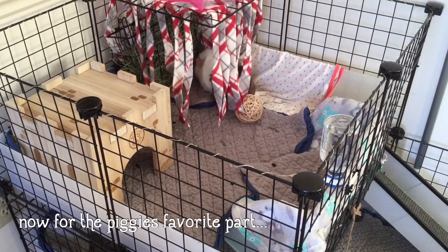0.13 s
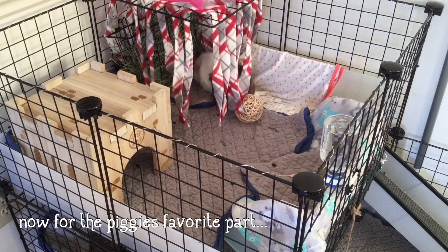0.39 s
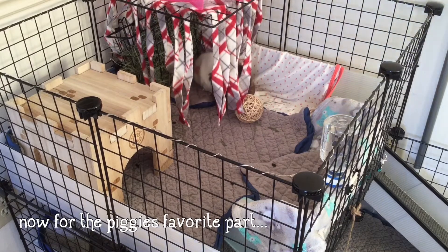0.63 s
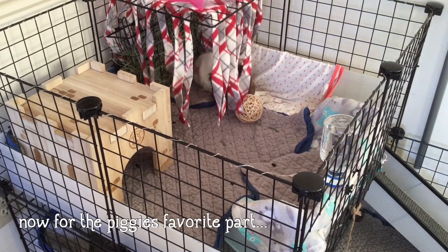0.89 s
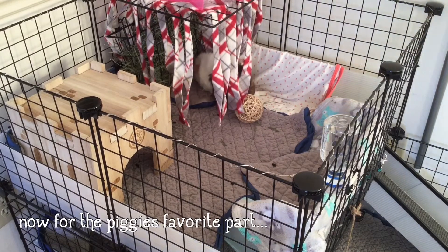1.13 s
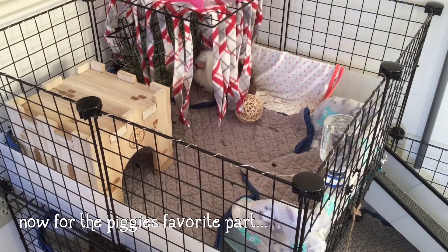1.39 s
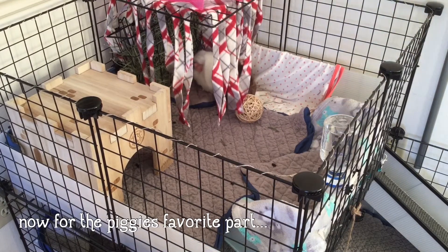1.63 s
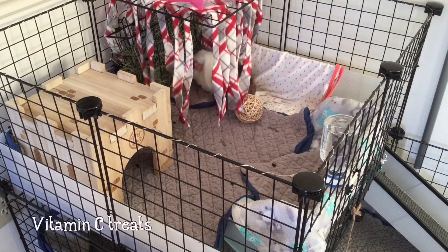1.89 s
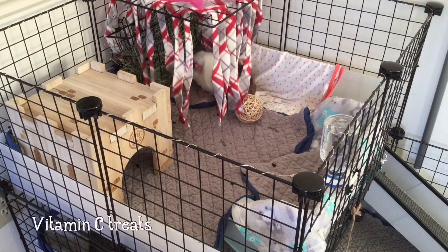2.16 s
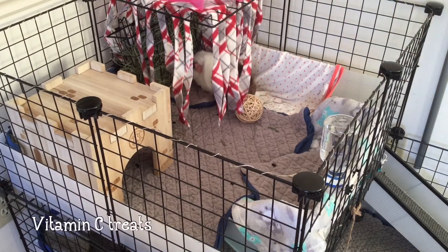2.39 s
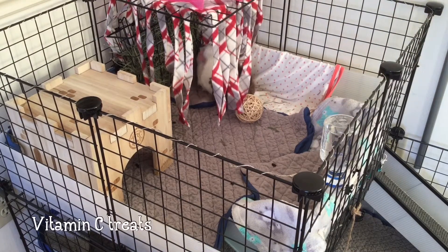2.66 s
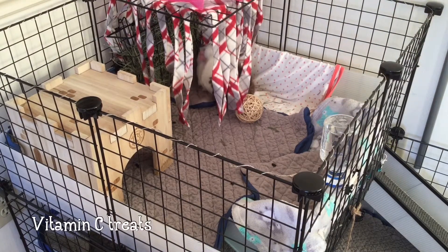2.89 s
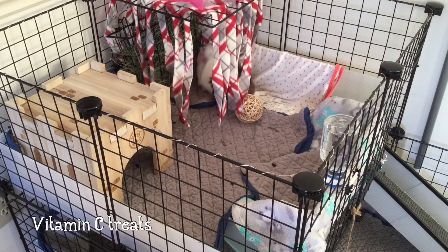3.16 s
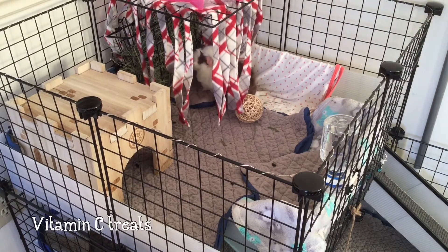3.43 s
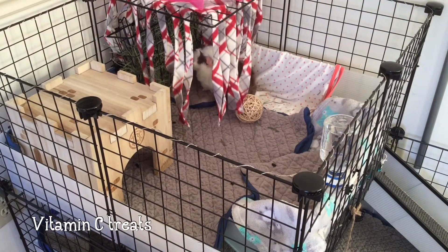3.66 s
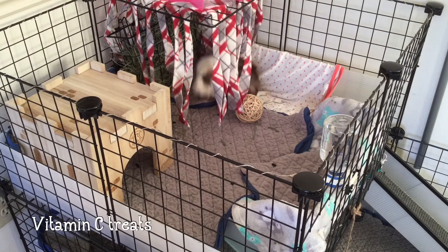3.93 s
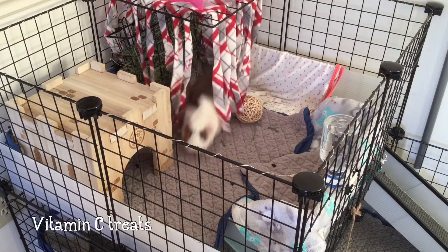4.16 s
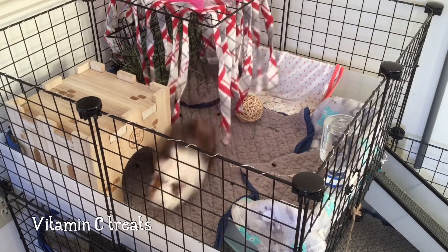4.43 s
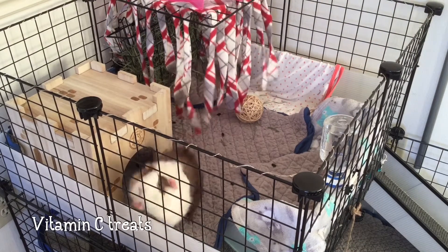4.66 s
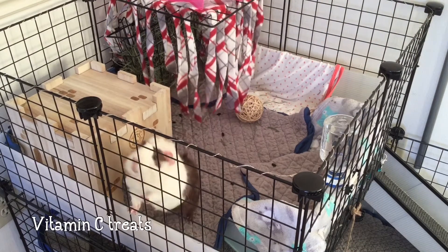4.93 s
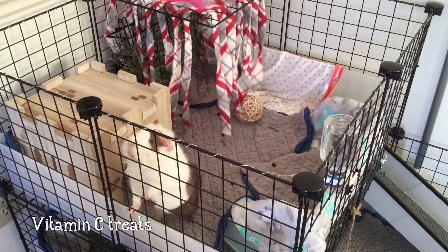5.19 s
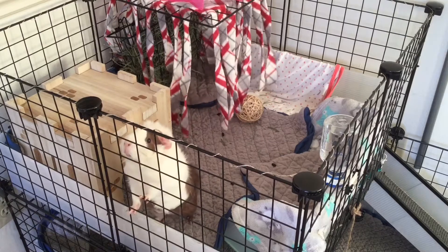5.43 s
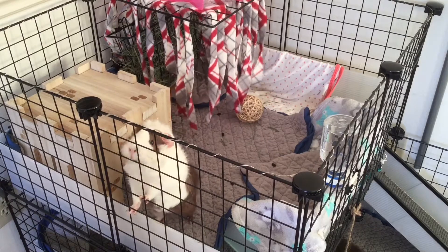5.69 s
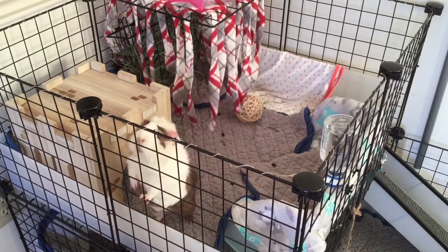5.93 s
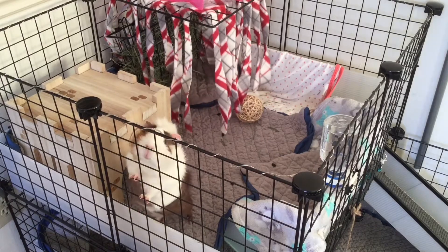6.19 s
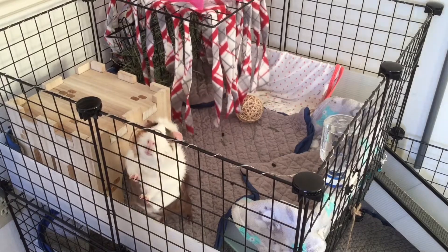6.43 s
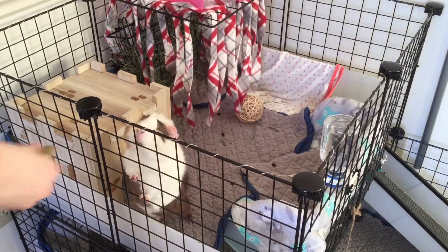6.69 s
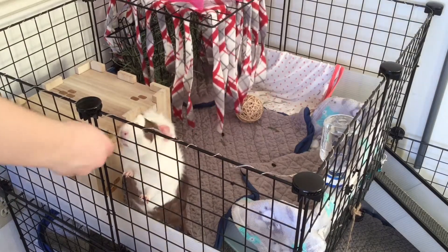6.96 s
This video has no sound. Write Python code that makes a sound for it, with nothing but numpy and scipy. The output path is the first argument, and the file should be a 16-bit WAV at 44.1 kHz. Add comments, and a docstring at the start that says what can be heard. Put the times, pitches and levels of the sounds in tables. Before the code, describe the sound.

A quiet room with a faint low rumble and thin hiss, heard closely. From 0 to 1 s, treats tap lightly inside a crinkly packet, with clear pairs of clicks near 0.06 and 0.7 s and slight rustle. One bright film crack comes at 1.2 s, then a little cluster of taps near 1.75 s. From 2 s the handling grows busy: irregular rustling, crackles and soft padded thuds. The strongest snaps come at about 3.0 to 3.4 s, with a knock on the cage near 3.17 s. Swishing, crisp rustle surges at 3.8 and 4.2 to 4.6 s over dull thumps, dips around 4.85 s, and bursts again with hollow taps at 5.3 to 5.4 s. After 5.5 s it falls away quickly to sparse soft bumps, tiny rubbing squeaks and isolated taps, nearly still by 7 s.

```python
"""A crinkly treat packet is handled beside a small-animal cage, close to the microphone, in a quiet room.
From the start the room rumbles and hisses faintly, the film rustles in random slips and the floor drums.
Taps of the contents, soft thuds and knocks on the cage soon join in, then slower sweeps and faint squeaks.
After a second the film starts to crack. Handling is busiest from two to five and a half seconds, then fades.
Snaps are noise jolts in resonances and thuds are short decaying tones, each with a noise tail for the room."""
import sys
import numpy as np
from scipy import signal
from scipy.fft import rfft, irfft, next_fast_len
from scipy.io import wavfile
from scipy.ndimage import uniform_filter1d, map_coordinates

SR = 44100
rng = np.random.default_rng(int(sys.argv[2]) if len(sys.argv) > 2 else 0)


def digitize_waveform(pressure):
    """Quantize a signal to 16-bit integers and store it at the path in sys.argv[1].

    Rows of a 2-D input are taken as channels; values are limited to [-1, 1].
    """
    field = np.atleast_2d(pressure).T
    bounded = np.clip(field, -1, 1)
    quanta = np.round(bounded * 32767).astype(np.int16)
    wavfile.write(sys.argv[1], SR, quanta)


def linear_from_db(decibels):
    """Turn decibels (scalar or array-like) into linear amplitude factors; 0 gives 1."""
    return 10 ** (np.asarray(decibels, float) / 20)


N = 311787  # length in samples


def unit(x):
    """Scaled to rms 1."""
    return x / np.sqrt(np.mean(x ** 2) + 1e-20)


def along(points, hz):
    """Values between (Hz, value) points, on a log frequency axis."""
    point_hz, value = np.transpose(points)
    return np.interp(np.log(hz + 1), np.log(point_hz + 1), value)


def filtered(x, response):
    """x times a response of frequency."""
    size = next_fast_len(x.shape[-1] + 8192)
    hz = np.fft.rfftfreq(size, 1 / SR)
    return irfft(rfft(x, size) * response(hz), size)[..., :x.shape[-1]]


def shaped(x, points):
    """x coloured by a curve of (Hz, dB) points."""
    return filtered(x, lambda f: linear_from_db(along(points, f)))


def band(hz, width):
    """Response of a causal resonance that passes 1 at its centre."""
    return lambda f: 1j * f * width / (hz * hz - f * f + 1j * f * width)


def packet(f, flat_db):
    """The packet's resonances, alternating in sign, over a flat response."""
    # Each row: centre in Hz, width in Hz, gain in dB.
    resonances = [(312, 43, -19), (625, 23, 15.5), (1111, 15, 1), (1326, 65, 9), (2420, 390, 7),
                  (3200, 32, -39.5)]
    response = linear_from_db(flat_db)
    for k, (hz, width, db) in enumerate(resonances):
        response = response + (-1) ** k * linear_from_db(db) * band(hz, width)(f)
    return response


def wobble(rate):
    """A smooth random curve, rate knots a second."""
    knots = rng.standard_normal(int(N * rate / SR) + 4)
    return map_coordinates(knots, [np.arange(N) * rate / SR])


def grains(rate, spread_db):
    """Random slips, rate a second; a positive spread makes a few much larger, a negative one much smaller."""
    struck = rng.random(N) < rate / SR
    return struck * rng.standard_normal(N) * linear_from_db(spread_db * rng.exponential(size=N))


def tails(count):
    """Room answers of energy 1: noise in which each frequency dies at its own speed."""
    # Reverberation of the room. Each row: frequency in Hz, time to fall by 60 dB in seconds.
    room = [(150, 0.22), (1000, 0.25), (5000, 0.13), (13000, 0.25)]
    hz, t, z = signal.stft(rng.standard_normal((count, SR // 3)), SR, nperseg=256)
    decay = linear_from_db(-60 * t / along(room, hz)[:, None])
    tail = signal.istft(z * decay, SR, nperseg=256)[1]
    tail = np.pad(tail, ((0, 0), (SR // 250, 0)))  # the nearest wall answers after 4 ms
    return tail / np.linalg.norm(tail, axis=1, keepdims=True)


def laid(times, sounds, wet_db):
    """Each sound at its time, with its own room answer."""
    wet = signal.fftconvolve(sounds, tails(count=len(sounds)), axes=1)
    out = np.zeros(N + 2 * SR)
    for s, dry, answer in zip(times, sounds, wet):
        start = round(s * SR)
        out[start:start + len(dry)] += dry
        out[start:start + len(answer)] += linear_from_db(wet_db) * answer
    return out[:N]


def peaked(x, db):
    """x scaled to a peak in dB."""
    return linear_from_db(db) * x / np.abs(x).max()


def creases(rows, crumple_db=-26, crumb_db=7, rise=0.002, wet_db=-3):
    """A crease jolts and crumples on; hollow body, crisp edge, film and low knock each answer in their range.

    Each row: start in seconds, body, edge and film peak in dB, knock rms in dB, crumpling t60 in seconds."""
    t = np.arange(6144) / SR
    jolt_s = 0.0012  # time constant of the jolt's decay
    sounds = []
    for s, body_db, edge_db, film_db, knock_db, t60 in rows:
        noise = rng.standard_normal((5, len(t)))
        edge_hz = 2613 * np.exp(0.18 * noise[0, 0])  # each edge rings at its own pitch
        crumbs = linear_from_db(crumb_db * unit(uniform_filter1d(noise[4], size=60)))  # uneven crumbs
        crumple = linear_from_db(crumple_db - 60 * t / np.clip(t60, 0.004, 0.3)) * crumbs * noise[:4]
        jolt = (t == 0) + 0.29 * np.exp(-t / jolt_s) * noise[3::-1]
        for_body, for_edge, for_film, for_knock = crumple * (1 - np.exp(-t / rise)) + jolt
        body = filtered(for_body, lambda f: band(1150, 1300)(f) ** 3 * packet(f, flat_db=5.0))
        edge = filtered(for_edge, lambda f: band(edge_hz, 1.2 * edge_hz)(f) ** 4)
        film = filtered(for_film, lambda f: band(11000, 17000)(f) ** 3)
        knock = filtered(for_knock, lambda f: band(400, 450)(f) ** 3)
        knock = knock / np.std(knock[:SR // 80])  # rms 1 over its first 12.5 ms
        bright = peaked(edge, edge_db) + peaked(film, film_db)
        sounds.append(peaked(body, body_db) + bright + linear_from_db(knock_db) * knock)
    return laid([row[0] for row in rows], np.array(sounds), wet_db)


def air():
    """The room's low rumble and faint hiss: shaped noise, wavering a little."""
    # Spectrum of the room. Each row: frequency in Hz, relative level in dB.
    spectrum = [(15, -63.5), (30, -12), (45, 7), (76, 0), (180, -12.5), (326, -14.5), (427, -24),
                (624, -25.5), (863, -38.5), (1650, -45), (2160, -35), (3820, -44.5), (14800, -75.5),
                (16000, -37.5)]
    noise = shaped(rng.standard_normal(N), spectrum)
    return linear_from_db(-64.5 + 0.4 * wobble(0.98)) * unit(noise)


def handling():
    """Clumped slips of the film in the packet's resonances, a finer hiss, and the floor drumming."""
    # Loudness of the rustle. Each row: time in seconds, level in dB.
    rustle_level = [(0, -63), (.16, -70), (.4, -72.5), (.55, -91), (.71, -76), (.85, -67), (1.02, -79.5),
                    (1.4, -81.5), (1.6, -77), (1.9, -72.5), (2.1, -55), (2.45, -58.5), (2.68, -52),
                    (2.8, -64), (3.15, -47.5), (3.29, -59), (3.5, -69.5), (3.68, -55.5), (3.82, -44.5),
                    (3.95, -51.5), (4.2, -46), (4.42, -52.5), (4.6, -51.5), (4.88, -65.5), (5.1, -56),
                    (5.3, -49), (5.48, -69), (5.9, -76), (7.07, -86.5)]
    # Loudness of the film's fine hiss. Each row: time in seconds, level in dB.
    hiss_level = [(0, -78), (.5, -79), (.8, -74.5), (1.05, -80.5), (1.9, -82), (2.3, -69), (2.45, -77),
                  (2.6, -67), (2.78, -77), (2.9, -64), (3.3, -67), (3.55, -68), (3.69, -71), (3.75, -52.5),
                  (3.95, -60), (4.2, -51), (4.45, -54.5), (4.67, -61.5), (4.8, -72), (4.86, -60),
                  (5.12, -59), (5.3, -52), (5.47, -76), (5.6, -79.5), (7.07, -80)]
    # Spectra of rustle, hiss and drumming. Each row: frequency in Hz, relative level in dB.
    rustle_spectrum = [(160, -7.5), (280, -3), (377, -3), (414, -12), (672, -3.5), (993, -14.5),
                       (1180, -5.5), (1410, -11.5), (7000, -28.5), (9100, -52.5), (15400, -120)]
    hiss_spectrum = [(2650, -1.5), (4500, -4), (7500, -6), (12000, -5.5), (15600, -4.5), (16200, -37.5)]
    drum_spectrum = [(50, -2), (90, 3.5), (160, 2), (240, 3), (400, -41.5)]
    t = np.arange(N) / SR
    rustle_db = np.interp(t, *np.transpose(rustle_level))
    hiss_db = np.interp(t, *np.transpose(hiss_level))
    # the drumming is at -59 dB for a rustle of -54 dB, follows it by 0.89 dB per dB, never below -68 dB
    drum_db = np.maximum(-59 + 0.89 * (rustle_db + 54), -68)

    swell = linear_from_db(2.5 * wobble(22))
    slips = swell * linear_from_db(2 * wobble(70)) * grains(2500, spread_db=2.6)
    rustle = unit(filtered(shaped_slips(slips, rustle_spectrum), lambda f: 1 + 0 * f))
    fine = np.sqrt(swell) * linear_from_db(1.5 * wobble(40)) * grains(9000, spread_db=-3.0)
    hiss = unit(shaped(fine, hiss_spectrum))
    drum = unit(linear_from_db(4.3 * wobble(23)) * shaped(rng.standard_normal(N), drum_spectrum))

    dry = linear_from_db(rustle_db) * rustle + linear_from_db(hiss_db) * hiss
    answer = signal.fftconvolve(dry, tails(count=1)[0])[:N]
    return dry + linear_from_db(-5.5) * answer + linear_from_db(drum_db) * drum


def shaped_slips(slips, spectrum):
    """Slips of the film coloured by their spectrum and the packet's resonances."""
    return filtered(slips, lambda f: linear_from_db(along(spectrum, f)) * packet(f, flat_db=13.5))


def taps():
    """The contents tap: a jolt rings the hollow packet, with an edge as crisp as the tap is hard."""
    # Each row: start in seconds, hollow peak in dB, hardness as the edge over the hollow in dB.
    hits = [(0.02, -48.5, -3), (0.063, -34.5, -2), (0.322, -50.5, -19), (0.52, -55, 1),
            (0.661, -42.5, -1.5), (0.706, -35.5, -1.5), (0.863, -43, -3), (0.988, -48, -8),
            (1.341, -59, 0.5), (1.653, -50.5, -3), (1.741, -35.5, -9), (1.747, -38, 1.5),
            (1.939, -36.5, -16), (1.97, -46.5, 15.5), (2.031, -52, 10), (2.073, -40.5, 2.5),
            (2.191, -34.5, -17), (2.215, -43.5, 4), (2.228, -37, 6.5), (2.473, -37.5, -28),
            (2.483, -53.5, 18), (2.626, -48.5, 15.5), (2.66, -44, -26), (2.816, -38.5, -33), (3.11, -35, 9),
            (3.29, -33.5, -6), (3.363, -38, -17), (3.376, -39, 0), (3.437, -34.5, -8), (3.454, -35, -17),
            (3.467, -29, -19), (3.617, -37.5, -3), (3.689, -42, 11.5), (3.699, -28, -31), (3.806, -31.5, 2),
            (4.1, -30, 2), (4.157, -41.5, 9.5), (5.085, -38.5, -1), (5.316, -28, -1), (5.362, -27.5, -9),
            (5.374, -46, 11), (5.398, -32, -9.5), (5.529, -36.5, -30), (5.768, -50.5, -14),
            (5.829, -44, -22), (6.055, -64.5, 5.5), (6.117, -58, -11), (6.633, -46.5, -22)]
    rows = []
    for s, db, hard in hits:
        edge_db = db + hard
        rows.append((s, db, edge_db, edge_db - 28, db - 24, 0.035))
    return creases(rows)


def thuds():
    """Soft paws and hands thud: the padded floor rings for a few cycles after a soft rise."""
    # Each row: start in seconds, peak in dB, pitch in Hz.
    hits = [(0.054, -54.5, 205), (0.326, -51, 94), (0.659, -53, 265), (0.707, -47.5, 201),
            (1.552, -51.5, 108), (1.734, -52, 203), (1.919, -53.5, 170), (2.028, -52.5, 216),
            (2.125, -49.5, 220), (2.189, -52, 236), (2.321, -47, 212), (2.476, -39, 146), (2.598, -44, 164),
            (2.78, -43, 157), (3.03, -47, 123), (3.11, -39, 214), (3.163, -38.5, 119), (3.291, -45, 90.5),
            (3.409, -35, 90.5), (3.756, -37, 167), (3.848, -37, 219), (3.939, -37.5, 154),
            (4.08, -36.5, 163), (4.2, -36, 172), (4.356, -39, 136), (4.379, -42.5, 168),
            (4.463, -47.5, 202), (4.557, -36, 154), (4.655, -42.5, 182), (4.871, -46, 195),
            (5.097, -48, 224), (5.145, -43, 149), (5.398, -42.5, 138), (5.525, -46.5, 228),
            (5.681, -47.5, 84), (5.817, -54, 159), (6.253, -48, 171), (6.269, -45, 41.9), (6.817, -44, 94),
            (6.873, -53, 106.5)]
    t = np.arange(SR // 4) / SR
    s, db, hz = np.transpose(hits)[:, :, None]
    rise = 1 - np.exp(-t / 0.00067)
    decay = linear_from_db(-60 * t / 0.037)  # 60 dB in 37 ms
    ring = rise * decay * np.sin(2 * np.pi * hz * t)
    ring = ring / np.abs(ring).max(axis=1, keepdims=True)
    return laid(s[:, 0], linear_from_db(db) * ring, wet_db=7.5)


def knocks():
    """Knuckles and paws knock the cage: a jolt in the low resonance, with the other parts silent."""
    # Each row: start in seconds, rms over the first 12.5 ms in dB.
    hits = [(.062, -53), (.661, -50.5), (1.195, -63), (1.939, -52), (2.19, -48), (2.217, -54),
            (2.377, -50.5), (2.624, -51.5), (2.814, -46), (3.109, -48), (3.165, -36), (3.293, -44),
            (3.376, -42.5), (3.436, -43.5), (3.699, -44), (4.191, -45), (5.178, -48), (5.328, -44),
            (5.528, -47.5), (6.115, -64.5), (6.255, -66.5)]
    silent_db = -120
    return creases([(s, silent_db, silent_db, silent_db, db, 0.035) for s, db in hits])


def sweeps():
    """Slower sweeps of the film: strong crumpling swells up and drowns the first jolt."""
    # Each row: start in seconds, hollow body peak in dB, film peak in dB, t60 in seconds.
    strokes = [(0.249, -55.5, -91, 0.1), (0.739, -60, -51.5, 0.14), (0.84, -54.5, -60, 0.25),
               (1.556, -54.5, -56, 0.046), (1.669, -55.5, -62, 0.089), (2.332, -41.5, -45, 0.13),
               (2.519, -47, -53, 0.19), (2.847, -48, -47, 0.027), (3.733, -32.5, -41, 0.083),
               (4.378, -47, -31.5, 0.02), (4.471, -38.5, -50, 0.045), (4.552, -39, -32, 0.22),
               (4.827, -46.5, -50, 0.22), (4.871, -40.5, -60, 0.045), (6.492, -69.5, -55, 0.14)]
    rows = []
    for s, body_db, film_db, t60 in strokes:
        edge_db = (body_db + film_db) / 2 + 2.5
        rows.append((s, body_db, edge_db, film_db, body_db - 20.5, t60))
    return creases(rows, crumple_db=30, crumb_db=4, rise=0.012, wet_db=-5)


def squeaks():
    """Short rubs: noise that sings in one narrow resonance, swelling and fading."""
    # Each row: start in seconds, length in seconds (cut off at 0.2), pitch in Hz,
    # resonance width in Hz before squaring, rms in dB before the swell.
    rubs = [(0.853, 0.23, 1210, 250, -67), (.516, 0.0095, 1800, 500, -54.5),
            (5.597, 0.089, 1130, 298, -59.5), (5.719, 0.19, 1300, 510, -66.5),
            (5.806, 0.022, 3980, 200, -73), (5.832, 0.041, 4240, 250, -74),
            (6.292, 0.046, 6470, 120, -79.5), (6.484, 0.053, 2460, 402, -64.5)]
    t = np.arange(SR // 5) / SR
    sounds = []
    for s, length, hz, width, db in rubs:
        rub = unit(filtered(rng.standard_normal(len(t)), lambda f: band(hz, width)(f) ** 2))
        swell = np.sin(np.pi * np.clip(t / length, 0, 1) ** 0.55)
        sounds.append(linear_from_db(db) * rub * swell)
    return laid([row[0] for row in rubs], np.array(sounds), wet_db=-12)


def cracks():
    """The film cracks: a crease gives way in one jolt that rings hollow body, edge and film."""
    # Each row: start in seconds, hollow body peak in dB, film peak in dB.
    snaps = [(1.195, -44, -24.5), (2.037, -30.5, -41), (2.126, -39.5, -36), (2.326, -36, -32.5),
             (2.376, -42, -69), (2.595, -45, -39), (2.707, -39, -40.5), (2.977, -32.5, -23.5),
             (3.031, -29, -15.5), (3.162, -37, -43), (3.166, -20.5, -22), (3.217, -22, -37.5),
             (3.381, -24.5, -24.5), (3.521, -38, -52), (4.181, -27, -32), (4.19, -28.5, -31.5),
             (4.634, -33, -44), (4.733, -52, -36), (5.179, -31.5, -38), (5.327, -34, -38)]
    rows = []
    for s, body_db, film_db in snaps:
        edge_db = body_db + 0.24 * (film_db - body_db) + 2.5  # about a quarter of the way from body to film
        rows.append((s, body_db, edge_db, film_db, body_db - 21.5, 0.036))
    return creases(rows)


def scene():
    """All sources at one microphone."""
    snapping = taps() + knocks() + sweeps() + cracks()
    return (air() + handling() + snapping + thuds() + squeaks())[None]


def band_limit(x):
    """A steep low-pass at the top of the band."""
    return signal.sosfilt(signal.butter(12, 16800, fs=SR, output="sos"), x)


def record(dry):
    """The microphone drops the deepest bass: five first-order low cuts, each 3 dB down at 40 Hz."""
    low_cut = lambda f: (1j * f / (40 + 1j * f)) ** 5
    return band_limit(filtered(dry, low_cut))


dry = scene()
out = record(dry)
digitize_waveform(out)
```